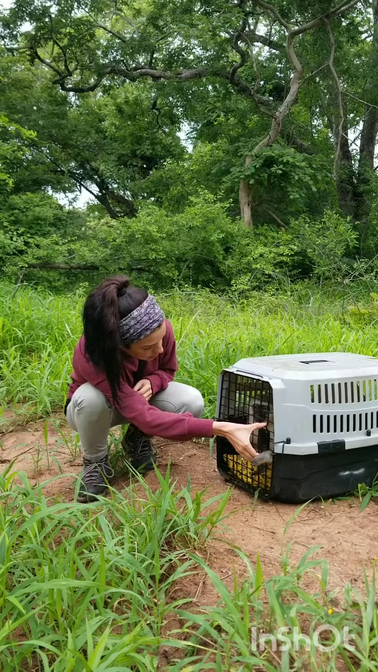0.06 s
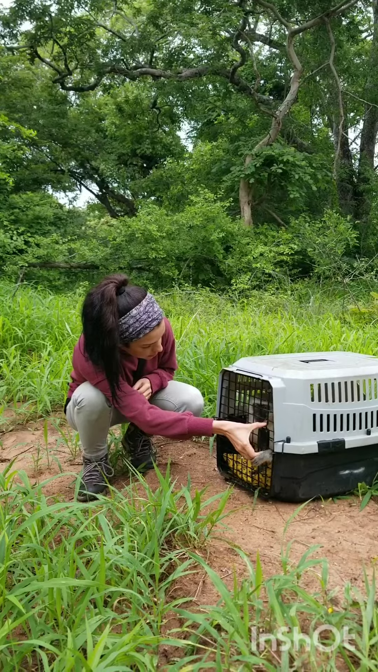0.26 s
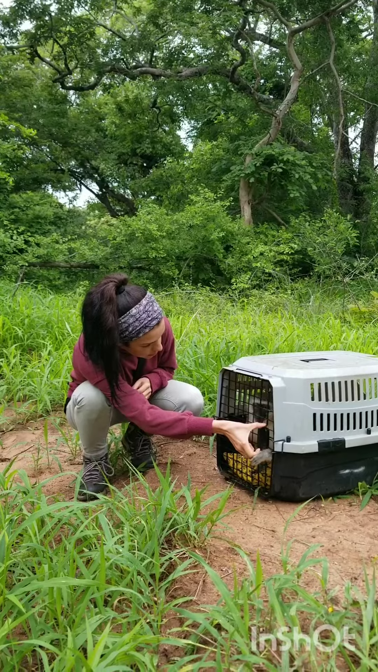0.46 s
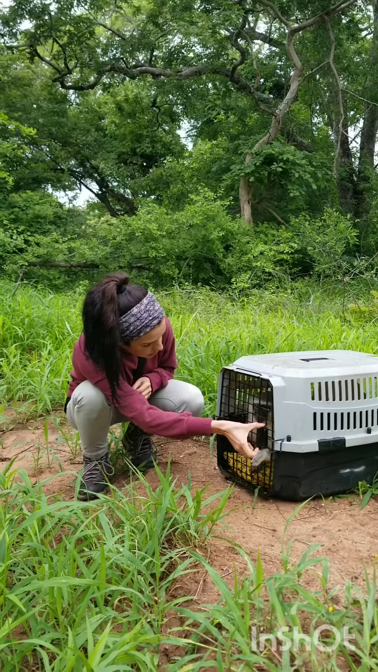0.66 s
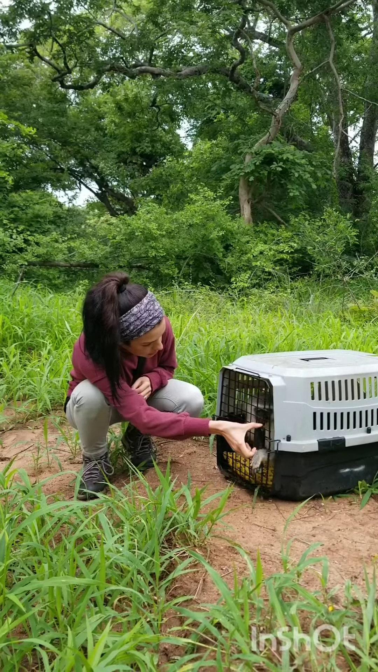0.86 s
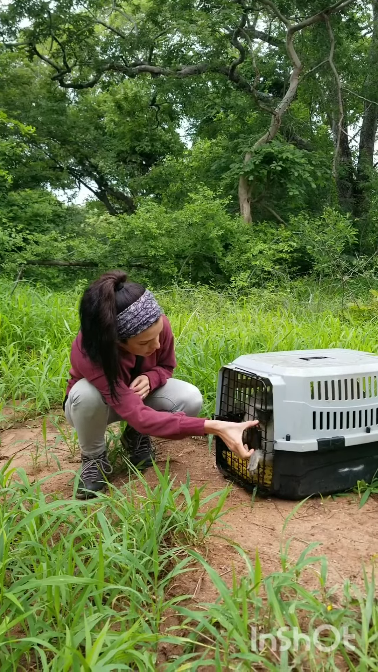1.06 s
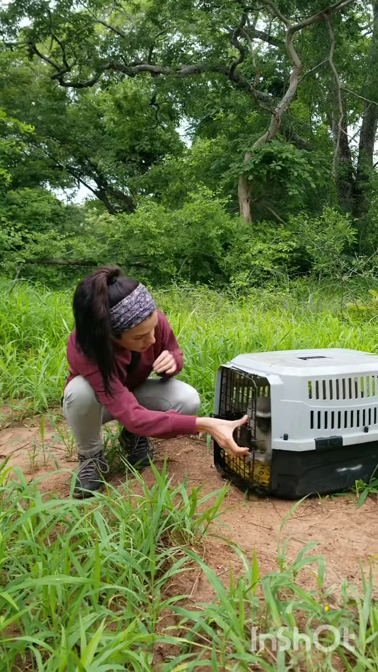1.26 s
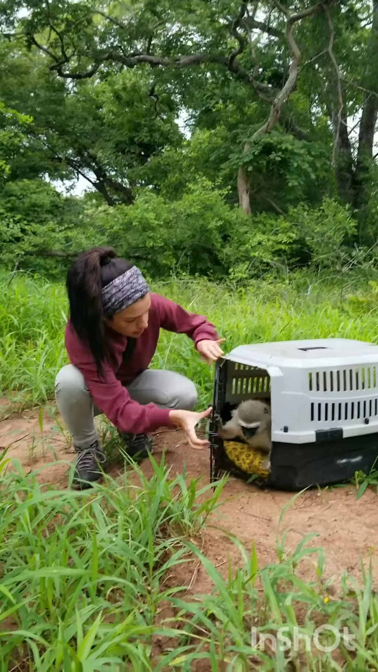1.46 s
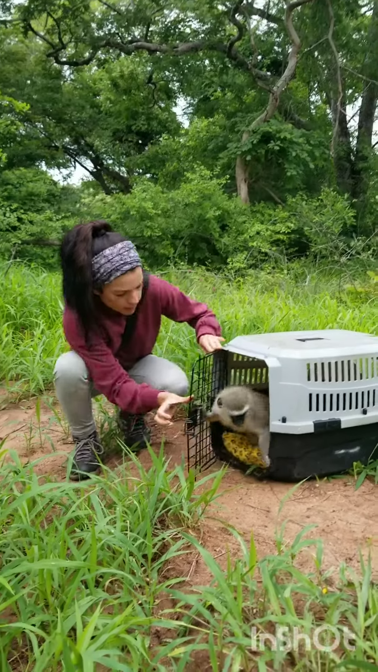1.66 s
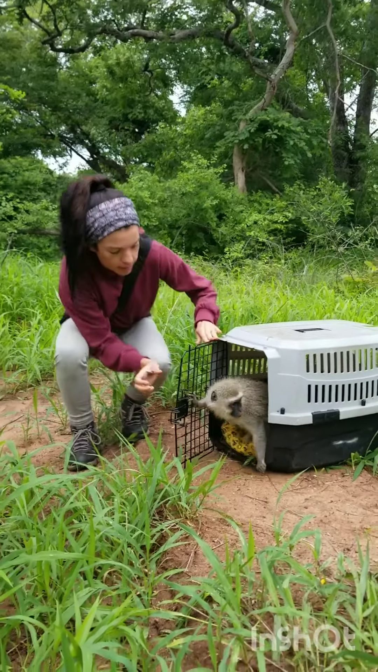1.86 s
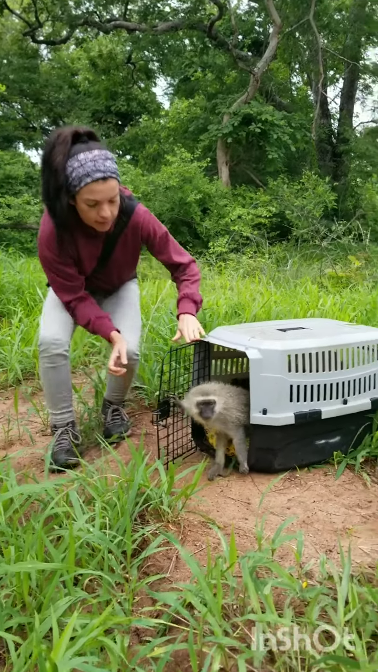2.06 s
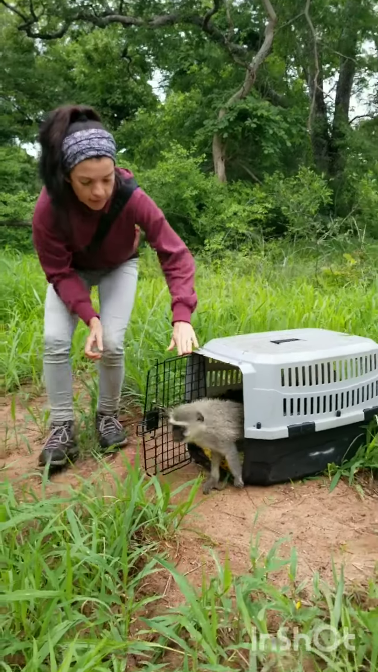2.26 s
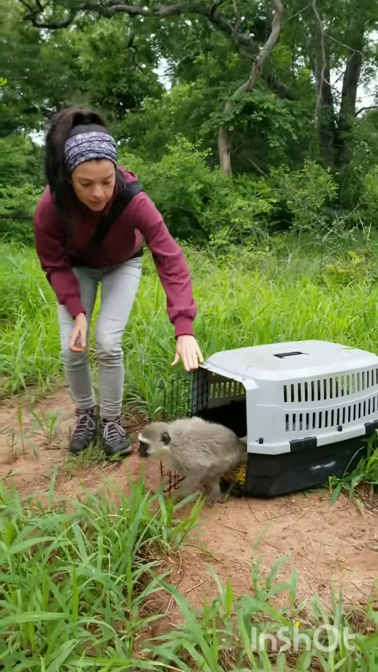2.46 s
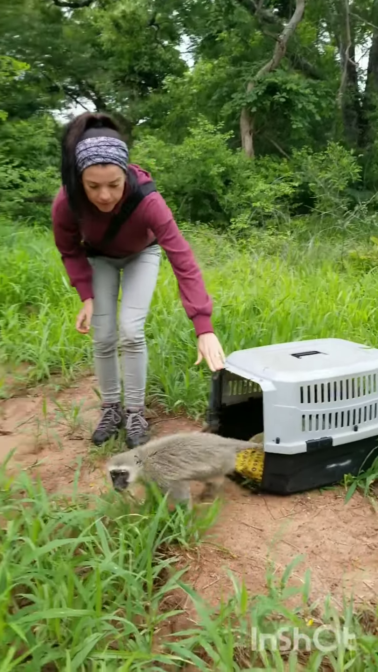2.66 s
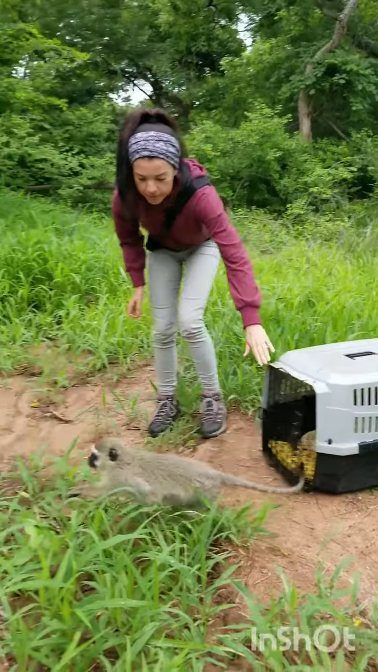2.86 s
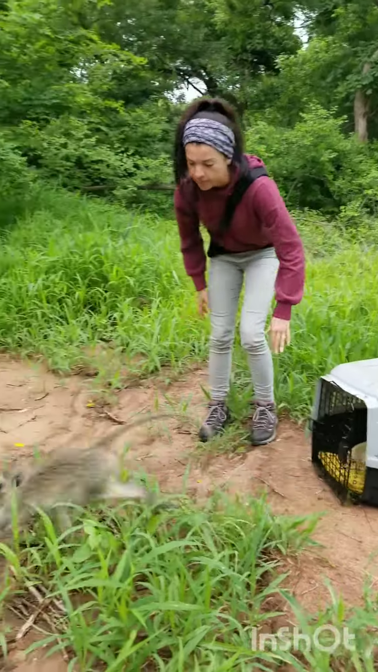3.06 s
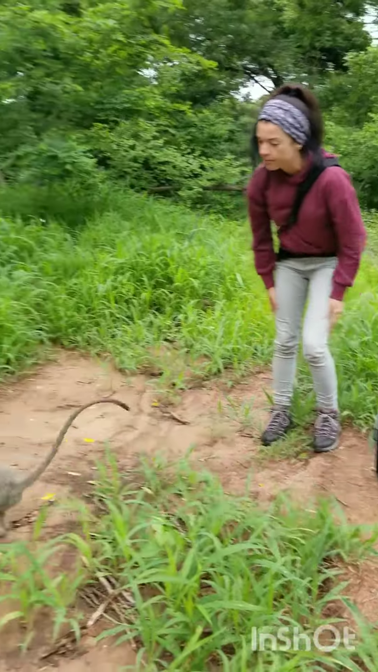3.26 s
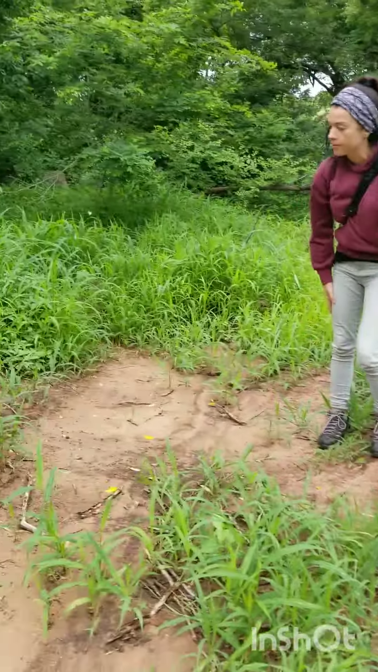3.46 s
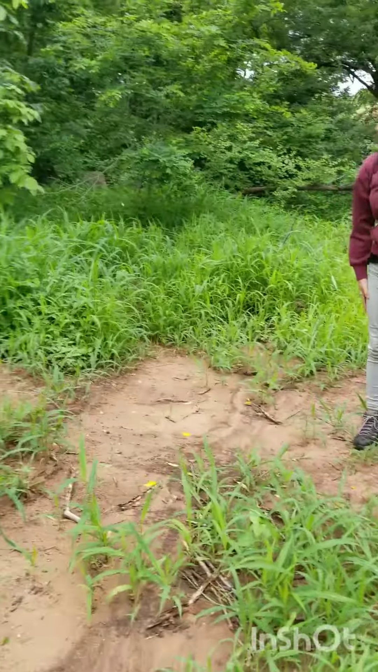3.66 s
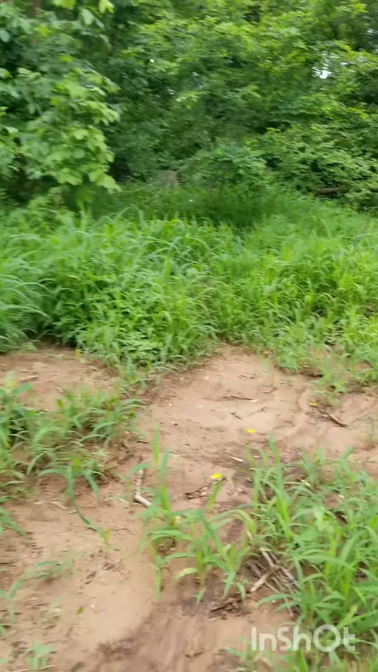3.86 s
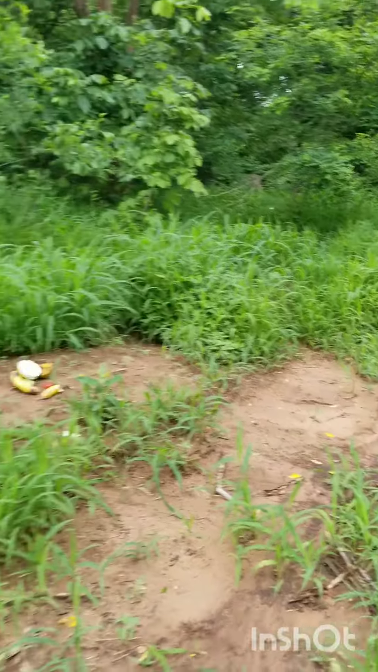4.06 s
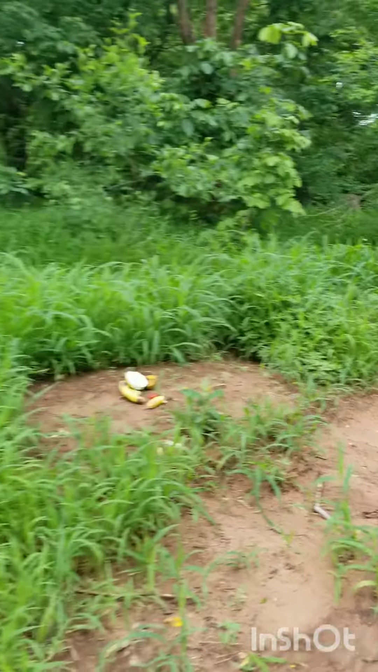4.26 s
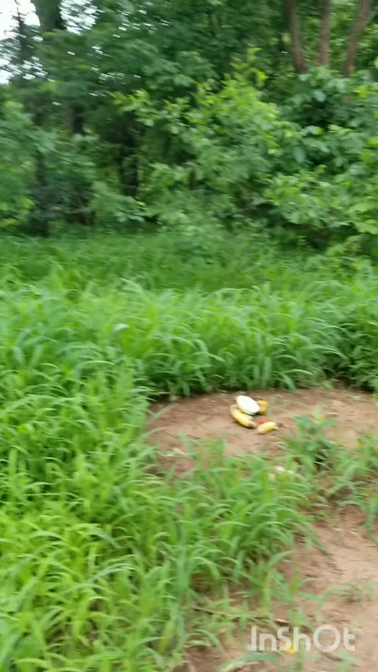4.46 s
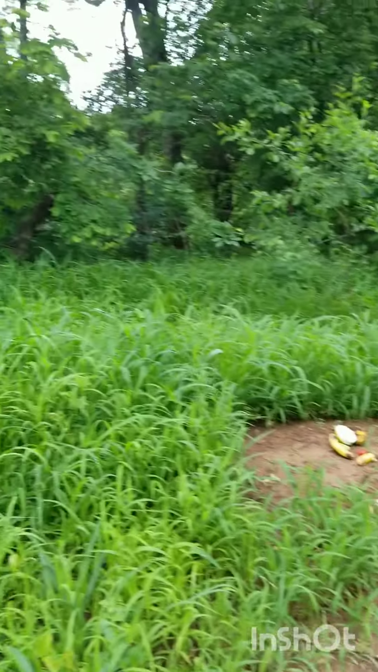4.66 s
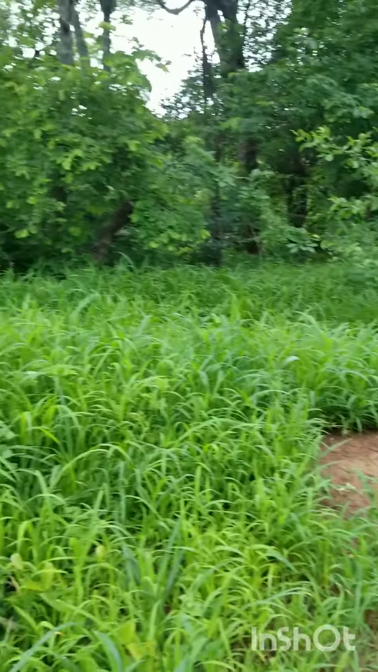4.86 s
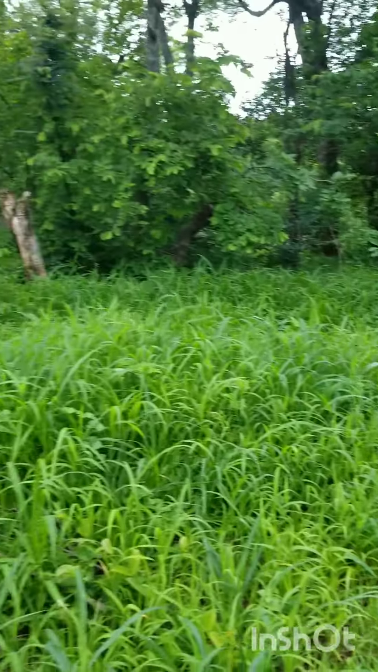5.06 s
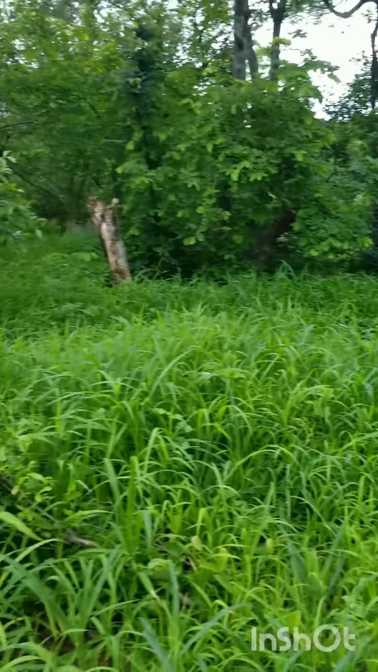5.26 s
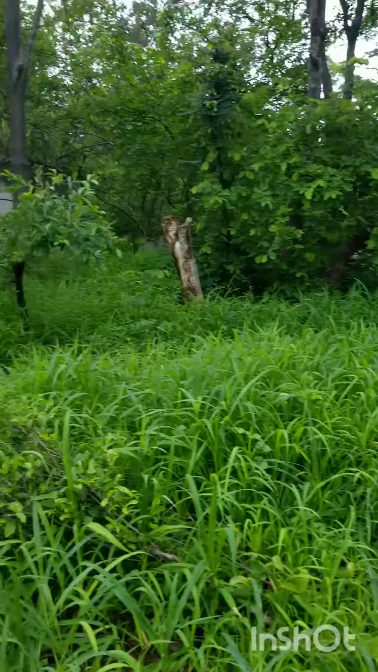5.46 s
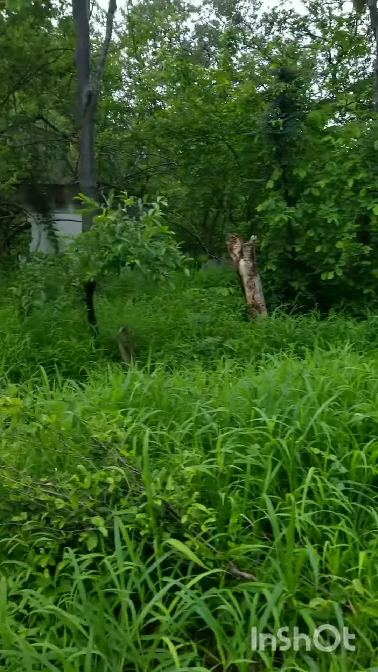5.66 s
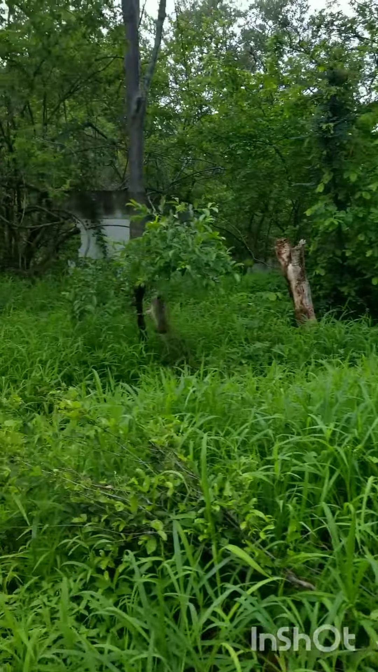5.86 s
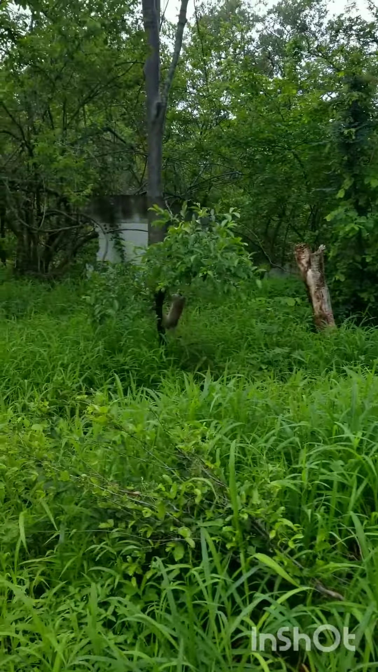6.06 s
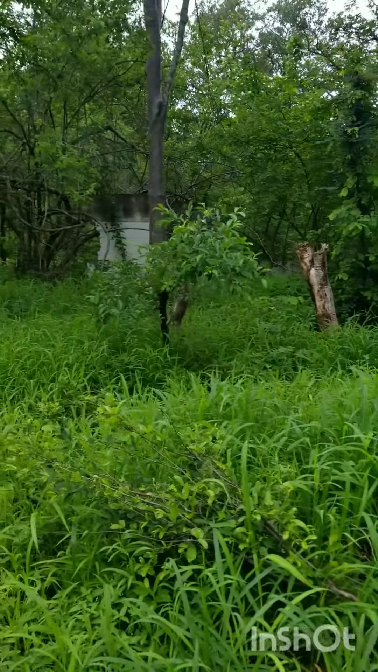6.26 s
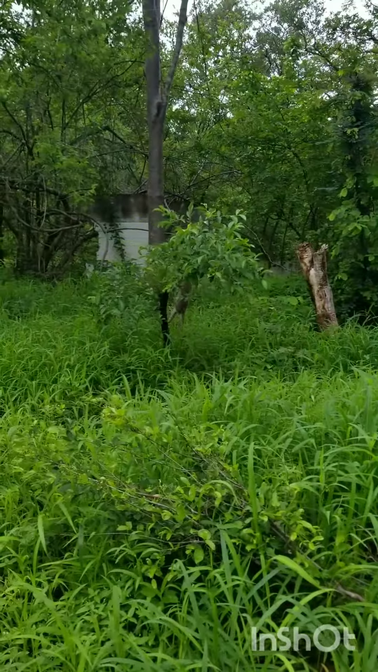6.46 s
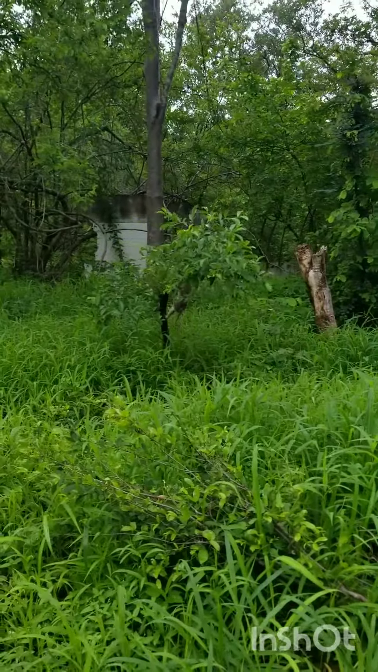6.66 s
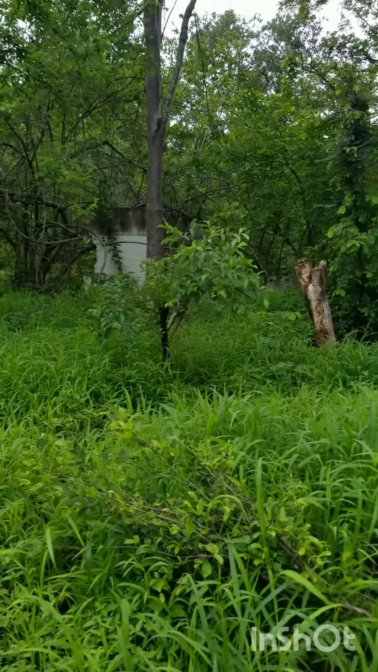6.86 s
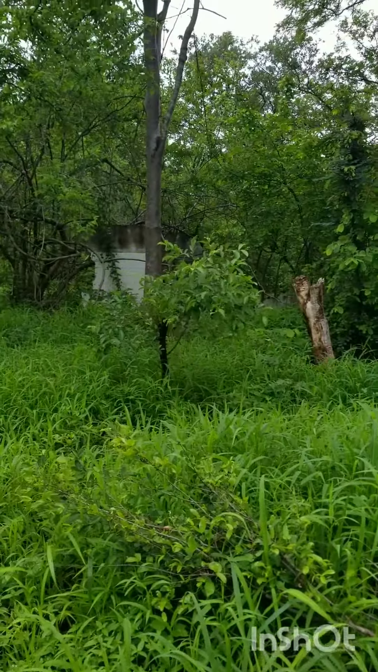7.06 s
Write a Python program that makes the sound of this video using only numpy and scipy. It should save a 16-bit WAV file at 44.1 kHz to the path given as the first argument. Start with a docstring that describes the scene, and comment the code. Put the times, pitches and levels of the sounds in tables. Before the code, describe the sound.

In a quiet clearing, faint birds whistle and insects sing. The latch of a pet crate scrapes and squeaks, and the wire door clanks. A monkey knocks its way out, rattling the door and bumping the hollow plastic shell. Grass then rustles and swishes with sharp cracks of stalks, close and mostly on the right. Soft wind rumble and handling thumps reach the hand-held microphone.

```python
"""Monkey released into tall grass

A pet crate is unlatched in a clearing: rods scrape and squeak, then a monkey knocks its way out,
rattling the wire door and ringing the plastic shell, and runs off through snapping stalks.
A hand-held phone turns after it: cloth and grass rustle close to its right port, wind and grip
thump in the bass. Far off, insects sing and small birds whistle and trill."""
import sys
import numpy as np
from scipy import signal
from scipy.fft import rfft, irfft, next_fast_len
from scipy.io import wavfile
from scipy.ndimage import uniform_filter1d

SR = 44100
rng = np.random.default_rng(int(sys.argv[2]) if len(sys.argv) > 2 else 0)


def wav_record(signal):
    """Record a signal, one row per channel, as 16-bit PCM in the file named by sys.argv[1]."""
    frames = np.transpose(np.atleast_2d(signal))
    bounded = np.clip(frames, -1, 1)
    # unit amplitude maps onto the largest positive 16-bit level
    quanta = np.round(bounded * 32767).astype(np.int16)
    wavfile.write(sys.argv[1], SR, quanta)


N = 313595
PORT_LAG = 21  # samples by which sound from the right reaches the left port late


def amp(db):
    return 10 ** (np.asarray(db) / 20)


def decay(t, t60):
    return amp(-60 * t / t60)


def unit_rms(x):
    return x / np.sqrt(np.mean(x ** 2) + 1e-20)


def wander(shape, span):
    """Random drift of rms 1, smoothed over span samples."""
    return unit_rms(uniform_filter1d(rng.standard_normal(shape), span))


def curves(rows):
    """Breakpoints in time become one scene-long curve per column."""
    times, *columns = np.transpose(rows)
    return [np.interp(np.arange(N) / SR, times, column) for column in columns]


def pan(pan_db):
    """Left and right gains of constant power; every pan is left minus right in dB."""
    left = amp(pan_db)
    return np.array([left, np.ones_like(left)]) * np.sqrt(2 / (1 + left ** 2))


def place(mix, start, sound, pan_db, lag=0):
    """Pans a sound into the mix at start seconds, the left side lag samples late."""
    for ch, gain in enumerate(pan(pan_db)):
        part = mix[ch, round(start * SR) + lag * (1 - ch):][:len(sound)]
        part += gain * sound[:len(part)]


def resonate(x, hz, width, stages=1):
    """Resonance at a steady or moving pitch: shifts hz down to zero, smooths, shifts back."""
    carrier = np.exp(2j * np.pi * np.cumsum(hz * np.ones(len(x))) / SR)
    pole = np.exp(-np.pi * width / SR)
    for _ in range(stages):
        x = 2 * (carrier * signal.lfilter([1 - pole], [1, -pole], x / carrier)).real
    return x


def equalise(x, eq):
    """Shapes x with an EQ curve and brings it to rms 1."""
    size = next_fast_len(x.shape[-1])
    hz, db = np.transpose(eq)
    gain = amp(np.interp(np.log(np.fft.rfftfreq(size, 1 / SR) + 1), np.log(hz + 1), db))
    return unit_rms(irfft(rfft(x, size) * gain, size)[..., :x.shape[-1]])


def burst(noise, t60, low_hz, high_hz):
    """A band of noise that starts at once and dies away, peak 1."""
    band = signal.butter(2, [low_hz, high_hz], "bandpass", fs=SR, output="sos")
    x = signal.sosfilt(band, noise * decay(np.arange(len(noise)) / SR, t60))
    return x / abs(x).max()


def textured_noise(shared, patchy_db, swell_db, grain_db):
    """Stereo noise with spectral patches, wide-band swells and grain; the shared part lags on the left."""
    spectra = signal.stft(rng.standard_normal((2, N)), nperseg=512)[2]
    patches = uniform_filter1d(rng.standard_normal(spectra.shape[1:]), 9, axis=0)
    patches = unit_rms(uniform_filter1d(patches, 10))
    swells = uniform_filter1d(rng.standard_normal(spectra.shape), 120, axis=1)
    swells = unit_rms(uniform_filter1d(swells, 7))
    spectra *= amp(patchy_db * patches + swell_db * swells)
    right, separate = signal.istft(spectra, nperseg=512)[1][:, :N] * amp(grain_db * wander(N, 30))
    left = shared * np.roll(right, PORT_LAG) + np.sqrt(1 - shared ** 2) * separate
    return np.array([left, right])


# Boom of the plastic shell: (pitch [Hz], level [dB], ring time [multiple of the shell t60])
SHELL_MODES = [(74.6, -19, 3.6), (115, -17, 2.2), (139.8, -3.5, 0.96), (185.4, -7, 0.87), (219, -5.5, 0.56),
               (257, -6.5, 0.92), (418, -4.5, 0.48), (513, -10, 0.44)]
# Clang of the wire door: (pitch [Hz], width [Hz], gain [dB])
DOOR_MODES = [(1000, 89, -4.5), (1390, 130, -18), (2250, 200, 10), (2660, 780, 10.5), (3460, 500, -6.5),
              (4270, 130, 8)]
# Hits on the crate: (time [s], door peak [dB], shell level [dB], treble peak [dB], knock peak [dB],
# door t60 [s], shell t60 [s], pan [dB])
CRATE_HITS = [(1.139, -26, -44.5, -43, -49, 0.058, .3, -3.5),
              (1.268, -34.5, -39.5, -57, -56, 0.072, .16, 3), (1.554, -50, -53.5, -59, -49, .13, 0.18, 3),
              (2.605, -56, -25, -48, -38.5, 0.061, 0.098, 1), (2.627, -60, -45.5, -60, -47, 0.16, .52, 2.5),
              (2.869, -25, -47, -26, -27.5, 0.067, 0.39, 6), (2.882, -33, -33, -61, -30.5, .031, 0.17, 0),
              (2.895, -32, -44.5, -35.5, -34.5, 0.24, 0.35, 6.5),
              (2.919, -47, -44, -49, -43, .067, 0.19, -2), (2.939, -45, -47, -50, -39, .06, 0.26, -1)]


def crate_hits():
    """Each blow knocks, rattles the wire door and rings the plastic shell."""
    out, t = np.zeros((2, N)), np.arange(12000) / SR
    for start, door_db, shell_db, treble_db, knock_db, door_t60, shell_t60, pan_db in CRATE_HITS:
        noise = rng.standard_normal(len(t))
        noise[0] = 3.5  # first contact
        shake = noise * decay(t, door_t60)
        door = sum(amp(db) * resonate(shake, hz, width) for hz, width, db in DOOR_MODES)
        door *= amp(door_db) / abs(door).max()
        phases = rng.uniform(-0.65, 1.0, len(SHELL_MODES))
        shell = sum(amp(db) * decay(t, shell_t60 * ring) * np.sin(2 * np.pi * hz * t + phase)
                    for (hz, db, ring), phase in zip(SHELL_MODES, phases))
        shell *= amp(shell_db) * np.minimum(t / 0.0035, 1)
        treble = amp(treble_db) * burst(noise, 1.46 * door_t60, 3900, 19500)
        knock = amp(knock_db) * burst(noise, 0.099, 560, 2070)
        place(out, start, door + shell + treble + knock, pan_db)
    return out


# Metallic ring of the latch rods: (pitch [Hz], width [Hz], gain [dB])
ROD_MODES = [(1640, 500, -17), (2590, 470, 6), (3040, 730, 9), (3630, 700, 5), (4390, 210, 0),
             (7050, 1000, 0), (8850, 870, 0), (13100, 3700, 10.5)]
# Strokes of the latch: (time [s], length [s], level [dB])
LATCH_STROKES = [(0.939, 0.057, -51), (1.012, .03, -51.5), (1.041, 0.066, -53.5), (1.096, .022, -46),
                 (1.124, 0.027, -44)]


def latch_scrapes():
    """The rods drag in their guides, and grit shakes their resonances."""
    out = np.zeros((2, N))
    for start, length, level_db in LATCH_STROKES:
        grit = amp(2.2 * wander(4000, 50)) * rng.standard_normal(4000)
        ring = sum(amp(db) * resonate(grit, hz, width, stages=2) for hz, width, db in ROD_MODES)
        stroke = signal.windows.tukey(round(length * SR), 0.4)
        place(out, start, amp(level_db) * stroke * unit_rms(ring)[-len(stroke):], pan_db=-0.8)
    return out


# Tiny metal squeaks: (time [s], pitch [Hz], length [s], level [dB], overtones [relative dB])
SQUEAKS = [(0.94, 2530, 0.013, -46, -22), (.95, 2910, .012, -51, -30), (0.954, 4350, 0.055, -52.5, -16),
           (0.959, 2170, 0.021, -72, -30), (1.004, 3220, 0.017, -51, -2.5), (1.011, 3150, 0.039, -52, -11),
           (1.017, 3960, 0.025, -55, -9), (1.061, 4490, 0.04, -45, -5), (1.062, 3420, 0.027, -47, -14),
           (1.086, 4500, 0.059, -66, -18), (1.131, 4490, 0.015, -39.5, -5), (1.15, 4470, 0.081, -68, -30),
           (1.401, 2480, 0.017, -54, -34), (2.641, 1414, 0.053, -59, -30), (2.678, 1476, 0.019, -54, -34),
           (2.974, 2950, 0.031, -52.5, -30), (3.012, 2910, 0.0095, -52.5, -30),
           (3.043, 2970, 0.0092, -57, -22)]


def wire_squeaks():
    """Rods and door wires stick and slip: a wobbling tone with two overtones."""
    out = np.zeros((2, N))
    for start, hz, length, level_db, overtone_db in SQUEAKS:
        pitch = hz * (1 + 0.014 * wander(round(length * SR), 80))
        phase = 2 * np.pi * np.cumsum(pitch) / SR
        squeak = np.sin(phase) + amp(overtone_db) * (np.sin(2 * phase) + 0.9 * np.sin(3 * phase))
        place(out, start, amp(level_db) * squeak * signal.windows.tukey(len(phase), 0.7), pan_db=-1.5)
    return out


# Dry cracks: (time [s], tick peak [dB], hollow peak [dB], edge peak [dB], pan [dB],
# hollow pitch [Hz], tick pitch [Hz])
TWIG_SNAPS = [(1.0995, -30, -66, -25, 2, 250, 2770), (1.3272, -36, -48, -32.5, -3, 250, 3200),
              (1.38, -61, -70, -44, -4, 330, 2620), (1.4001, -46, -58, -70, 14, 260, 2440),
              (1.6205, -44.5, -63, -41, 4, 387, 2460), (1.8016, -39, -48.5, -61, 10, 516, 2140),
              (1.8448, -39, -74, -40, -5, 280, 2360), (1.9069, -31, -43.5, -68, 12, 440, 2560),
              (2.0022, -19.5, -46, -21, -10, 845, 3240), (2.5485, -32, -74, -34, -10, 720, 1810),
              (2.954, -33, -50, -29, -8, 875, 2430), (2.9704, -30.5, -47.5, -20, -0.5, 355, 2920),
              (3.152, -35.5, -54, -58, -8, 257, 1700), (3.3216, -14, -38, -11, -8.5, 900, 1820),
              (3.3908, -29.5, -41, -26, -4.5, 270, 3380), (3.4162, -49, -48.5, -36, 1, 252, 3620),
              (3.455, -51, -53, -37, 0, 300, 3600), (4.691, -51, -75, -43, 3, 300, 2540),
              (5.4441, -21.5, -32.5, -12, -7.5, 545, 2300), (5.4605, -49, -41, -41, 6, 550, 4360),
              (5.5588, -20, -27, -16.5, -4.5, 547, 2180), (5.5633, -24, -37.5, -19, 10, 238, 2150),
              (5.9096, -44, -53, -42, -8, 760, 4640), (6.036, -41, -47, -36, -12, 322, 2440)]


def twig_snaps():
    """Stalks and twigs break: a mid tick, a hollow low part, a bright edge that the phone shadows."""
    out = np.zeros((2, N))
    for start, tick_db, hollow_db, edge_db, pan_db, hollow_hz, tick_hz in TWIG_SNAPS:
        noise = rng.standard_normal(3000)
        noise[0] = 5.27  # the break itself
        tick = amp(tick_db) * burst(noise, 0.013, 0.47 * tick_hz, 2.18 * tick_hz)
        hollow = amp(hollow_db) * burst(noise, 0.03, 0.64 * hollow_hz, 1.285 * hollow_hz)
        edge = amp(edge_db) * burst(noise, 0.019, 5800, 18000)
        place(out, start, tick + hollow, pan_db, PORT_LAG)
        place(out, start, edge, 2 * pan_db, PORT_LAG)  # the shadow pans treble twice as far
    return out


# Tone of the fizz at each port: (frequency [Hz], gain [dB])
FIZZ_EQ_LEFT = [(2000, -10), (5000, -2), (7500, 1.5), (10000, -1.5), (11500, 3.5), (12700, -1.5),
                (14200, 5.5), (15900, -28)]
FIZZ_EQ_RIGHT = [(2000, -24), (5300, -11.5), (6300, -4.5), (7700, -14), (9500, 0), (11300, -2),
                 (13000, 7.5), (15500, -1)]


def rustle_fizz(flicks_per_s=150, flick_db=-10, spread_db=5.5):
    """The fine top of the rustle: fibres hiss and single blades flick."""
    left, right = textured_noise(shared=0.053, patchy_db=1.73, swell_db=2.23, grain_db=0)
    onsets = rng.random(N) < flicks_per_s / SR
    strengths = amp(spread_db * np.minimum(rng.exponential(1, N), 4))
    envelope = signal.lfilter([1], [1, -0.97], onsets * strengths)
    flicks = amp(flick_db) * unit_rms(envelope * rng.standard_normal(N))
    return np.array([equalise(left + np.roll(flicks, PORT_LAG), FIZZ_EQ_LEFT),
                     equalise(right + flicks, FIZZ_EQ_RIGHT)])


# Tone of the rustle's body at each port: (frequency [Hz], gain [dB])
BODY_EQ_LEFT = [(150, -18), (400, -2), (900, -0.5), (2000, 1), (3200, -0.5), (4300, -0.5), (5500, 0),
                (8000, -46), (16000, -59)]
BODY_EQ_RIGHT = [(150, -13), (400, -4), (900, -2.5), (2300, 1.5), (3200, -0.5), (4000, 1), (5300, -12.5),
                 (6500, -19.5), (8000, -15), (16000, -46.5)]
# High-shelf ride on the body: (time [s], gain [dB])
BODY_BRIGHTNESS = [(0, 8), (.9, -1), (1.07, 10), (1.55, -10), (2.0, -6), (2.3, 4), (2.8, -9), (3.3, -2),
                   (3.6, 9.5), (4.2, 6.5), (4.4, -0.5), (4.8, 11), (5.4, -0.5), (5.8, 3), (6.3, 9),
                   (6.9, 7), (7.11, 10.5)]


def rustle_body(shelf_hz=3100):
    """The broad middle of the rustle: grainy rubbing that brightens and dulls."""
    left, right = textured_noise(shared=0.28, patchy_db=2.12, swell_db=1.78, grain_db=2.0)
    body = np.array([equalise(left, BODY_EQ_LEFT), equalise(right, BODY_EQ_RIGHT)])
    lows = signal.sosfiltfilt(signal.butter(2, shelf_hz, fs=SR, output="sos"), body)
    return lows + amp(curves(BODY_BRIGHTNESS)[0]) * (body - lows)


# Fader rides of the rustle: (time [s], fizz level [dB], body level [dB])
RUSTLE_FADERS = [(0, -78.5, -84.5), (.85, -75, -80.5), (1.05, -57, -69.5), (1.31, -68, -62.5),
                 (1.72, -67.5, -68), (1.96, -48.5, -51), (2.16, -56.5, -56), (2.3, -49, -63.5),
                 (2.65, -54, -58.5), (2.79, -50, -57), (3.01, -52, -56), (3.28, -56.5, -65.5),
                 (3.6, -48.5, -65), (3.75, -56.5, -70.5), (3.9, -45.5, -63), (4.1, -50, -60),
                 (4.25, -42.5, -54.5), (4.45, -38.5, -54.5), (4.57, -46, -57.5), (4.71, -45, -57.5),
                 (5.07, -54, -69.5), (5.27, -48, -59), (5.42, -38.5, -54.5), (5.6, -38.5, -55.5),
                 (5.85, -40.5, -61), (6.04, -55.5, -69), (6.35, -58, -77.5), (6.55, -65.5, -77.5),
                 (6.9, -69.5, -73.5), (7.04, -45.5, -51), (7.11, -59, -61)]
# Sudden sweeps of grass or sleeve: (time [s], body level [dB], fizz level [dB], t60 [s], pan [dB])
GRASS_SWISHES = [(3.455, -62, -53, 0.17, -3), (4.197, -51.5, -53, 0.29, 4), (6.918, -72, -51.5, 0.43, -16)]
# Pan moves as the phone turns, shared with the wind: (time [s], fizz pan [dB], wind pan [dB])
PHONE_TURN = [(0, -2, -2), (1.2, 1, 2.5), (1.9, -13, 3), (2.5, -6.5, -13), (3.3, -10.5, 2), (3.7, -7.5, -1),
              (4.9, -8, -4.5), (5.8, -18, -3.5), (6.5, -17.5, -24), (6.85, -6, -16), (7.03, -60, -22),
              (7.11, -20, -8)]


def rustle():
    """Cloth and grass rub and swish, mostly nearer the right port."""
    fizz_db, body_db = curves(RUSTLE_FADERS)
    fizz_pan_db = curves(PHONE_TURN)[0]
    fizz_gain = amp(fizz_db) * pan(fizz_pan_db)
    body_gain = amp(body_db) * pan(-2.5 + 0.13 * fizz_pan_db)  # less shadowed than the fizz
    t = np.arange(SR // 2) / SR
    for start, swish_body_db, swish_fizz_db, t60, pan_db in GRASS_SWISHES:
        place(body_gain, start, amp(swish_body_db) * decay(t, t60), pan_db)
        place(fizz_gain, start, amp(swish_fizz_db) * decay(t, t60), pan_db)
    return fizz_gain * rustle_fizz() + body_gain * rustle_body()


# Fader ride of the wind: (time [s], rumble level [dB], sub [relative dB])
WIND_FADERS = [(0, -76, -12), (.75, -72, -13), (1.4, -62, -16), (2.3, -68.5, -10), (2.9, -68, -21),
               (3.1, -59.5, 3.5), (4.0, -69, 4), (4.8, -61, 3.5), (5.1, -67, 8), (5.8, -65, 5.5),
               (6.6, -67.5, 8.5), (7.11, -69, 1)]
# Puffs of wind and shifts of grip:
# (centre time [s], half length [s], level [dB], pan [dB], sub [relative dB])
WIND_PUFFS = [(0.838, 0.037, -54, 0, -35), (1.148, 0.081, -62, -1, -15), (1.296, 0.046, -56, 0, -29),
              (1.817, 0.048, -56.5, 1, -24), (2.0, 0.015, -62, -13, -24), (2.206, 0.065, -64, 1, -5),
              (2.675, 0.086, -53.5, -3, -14), (2.853, 0.029, -50, 1, -35), (3.21, 0.036, -46, -3, -4),
              (3.402, 0.03, -52, -1, -15), (3.598, 0.053, -54.5, -6, 3.5), (3.822, 0.058, -53.5, 24, 0),
              (4.247, 0.064, -57.5, -26, 0), (4.377, .04, -57, -20, -9), (4.711, 0.036, -53, -28, -10),
              (4.774, 0.016, -45, -2, -17), (5.276, 0.17, -64.5, -4, -15), (5.841, 0.019, -54, -2, -13),
              (6.04, 0.059, -50, -30, -25), (6.22, 0.029, -53, -38, -16), (6.48, 0.024, -75, -20, 4),
              (6.73, 0.03, -56.5, -23, 0), (6.84, 0.053, -57, -16, -16), (6.983, 0.066, -52, -33, 1)]
# Tone of the wind's rumble and of its sub layer: (frequency [Hz], gain [dB])
RUMBLE_EQ = [(35, -48), (55, -2), (90, -0.5), (140, -8), (220, -15.5), (340, -24.5), (600, -48),
             (1100, -97)]
SUB_EQ = [(10, -36), (22, -2.5), (40, 19), (60, -51), (120, -54)]


def wind_buffet(veer_db=9):
    """Lumpy low pressure, unrelated at the two ports, swelling in puffs."""
    level_db, sub_db = curves(WIND_FADERS)
    veer = veer_db * wander(N, 4000)  # eddies wander from port to port
    rumble_gain = amp(level_db) * pan(curves(PHONE_TURN)[1] + veer)
    sub_gain = amp(sub_db) * rumble_gain
    for centre, half, puff_db, pan_db, puff_sub_db in WIND_PUFFS:
        t = np.arange(-2 * half, 2 * half, 1 / SR)
        swell = amp(puff_db) * np.exp(-(t / half) ** 2)
        place(rumble_gain, centre - 2 * half, swell, pan_db)
        place(sub_gain, centre - 2 * half, amp(puff_sub_db) * swell, pan_db)
    lumps = amp(3.06 * wander((2, N), 900))
    rumble = equalise(lumps * rng.standard_normal((2, N)), RUMBLE_EQ)
    sub = equalise(lumps * rng.standard_normal((2, N)), SUB_EQ)
    return rumble_gain * rumble + sub_gain * sub


# Handling thumps: (time [s], peak [dB], pitch [Hz], pan [dB])
FINGER_BUMPS = [(3.191, -38.5, 35.2, 5), (4.371, -39, 52.3, -24), (4.78, -40, 86, 7),
                (5.835, -40.5, 62.5, -24), (6.082, -31.5, 75.6, -36), (6.207, -31, 67.4, -39.5),
                (6.606, -42.5, 65, -24), (6.985, -35.5, 51, -28)]


def finger_bumps():
    """Fingers bump the phone, each a short, rounded bass pulse."""
    out = np.zeros((2, N))
    for time, peak_db, hz, pan_db in FINGER_BUMPS:
        cycles = np.arange(-1.5 / hz, 1.5 / hz, 1 / SR) * hz
        thump = -np.cos(2 * np.pi * cycles) * np.exp(-(cycles / 0.47) ** 2)
        place(out, time - 1.603 / hz, amp(peak_db) * thump, pan_db)
    return out


def leaf_echo(t60):
    """Scatter from the leaves: a short impulse response of fading noise."""
    t = np.arange(6000) / SR
    return rng.standard_normal(len(t)) * decay(t, t60)


# Falling whistles: (time [s], length [s], high pitch [Hz], low pitch [Hz], slide time [s],
# level at the low note [dB], opening accent [dB])
BIRD_WHISTLES = [(.1, .24, 2950, 2690, .12, -67, -8), (.452, .47, 2660, 2150, .24, -66, 14),
                 (1.29, .1, 2700, 2580, .07, -70, 0), (1.615, .5, 2550, 2110, .22, -66, 7)]


def bird_whistles(chirp_hz=400, chirp_s=0.008, rebound_hz_per_s=250, swell_db=6, fade_db=12):
    """Each whistle opens with a chirp, swells down to a low note and fades, blurred by the leaves."""
    out = np.zeros((2, N))
    for start, length, high_hz, low_hz, slide_s, level_db, accent_db in BIRD_WHISTLES:
        t = np.arange(0, length, 1 / SR)
        slide = np.maximum(1 - t / slide_s, 0)
        held_s = np.maximum(t - slide_s, 0)
        chirp = np.exp(-t / chirp_s)
        hz = low_hz + (high_hz - low_hz) * slide + rebound_hz_per_s * held_s + chirp_hz * chirp
        db = level_db - swell_db * slide - fade_db * held_s / (length - slide_s)
        db += accent_db * np.sqrt(chirp)
        db += 2.0 * wander(SR, 700)[:len(t)]  # moving air on the path
        hz *= 1 + 0.012 * wander(SR, 250)[:len(t)]
        envelope = np.sqrt(2) * amp(db) * signal.windows.tukey(len(t), 0.02)
        tone = envelope * np.sin(2 * np.pi * np.cumsum(hz) / SR)
        place(out, start, tone, pan_db=-4.5, lag=8)
        for pan_db in (24, -24):
            leaves = leaf_echo(t60=0.35)
            echo = signal.fftconvolve(tone, leaves / np.linalg.norm(leaves))
            place(out, start, amp(-4) * echo, pan_db)
    return out


# Quick trills: (time [s], notes [count], direct peak [dB], echo level [dB])
BIRD_TRILLS = [(.44, 4, -81, -83), (6.134, 3, -63, -82), (6.737, 3, -64, -83)]


def bird_trills(note_s=0.022, spacing_s=0.0455):
    """A small bird repeats a short down-sweep, each with a smeared echo."""
    out = np.zeros((2, N))
    hz = np.linspace(4350, 3350, round(note_s * SR))
    note = np.sin(2 * np.pi * np.cumsum(hz) / SR) * np.hanning(len(hz))
    for start, notes, direct_db, echo_db in BIRD_TRILLS:
        for onset in start + spacing_s * np.arange(notes):
            echo = unit_rms(np.convolve(note, leaf_echo(t60=0.3)))
            place(out, onset, amp(direct_db) * note, pan_db=1.5)
            place(out, onset, amp(echo_db) * echo, pan_db=-1.5)
    return out


# Distant insect beds: (pitch [Hz], width [Hz], level [dB])
INSECT_CHORUSES = [(5880, 420, -75), (6480, 480, -77)]


def insects(throb_db=3.2, drift_hz=70):
    """Each chorus merges into a narrow band of noise that swells and wavers."""
    out = np.zeros((2, N))
    for hz, width, level_db in INSECT_CHORUSES:
        gain = amp(level_db + throb_db * wander(N, 5000))
        pitch = hz + drift_hz * wander(N, 9000)
        for side in out:
            side += gain * unit_rms(resonate(rng.standard_normal(N), pitch, width, stages=2))
    return out


# Tone of the clearing's air: (frequency [Hz], gain [dB])
AIR_EQ = [(29, -55), (50, -16), (131, 2), (371, -14.5), (507, -12), (2270, -25), (2880, -20), (3180, -24),
          (5020, -29), (6390, -24), (7210, -61), (14900, -17), (16000, -28)]


def still_air(level_db=-68):
    """A faint, patchy bed of outdoor noise."""
    noise = textured_noise(shared=0.11, patchy_db=4.5, swell_db=-0.5, grain_db=-1.0)
    return amp(level_db) * equalise(noise, AIR_EQ)


def scene():
    """Noise at the phone, the distant clearing and the monkey's exit, mixed."""
    close = rustle() + wind_buffet() + finger_bumps()
    distant = still_air() + insects() + bird_whistles() + bird_trills()
    action = latch_scrapes() + wire_squeaks() + crate_hits() + twig_snaps()
    return close + distant + action


def record(dry):
    """The phone's band limit: a steep low-pass at 16 kHz."""
    lowpass = signal.firwin(511, 16000, window=("kaiser", 9), fs=SR)
    return signal.oaconvolve(dry, lowpass[None], "same", axes=1)


dry = scene()
out = record(dry)
wav_record(out)
```